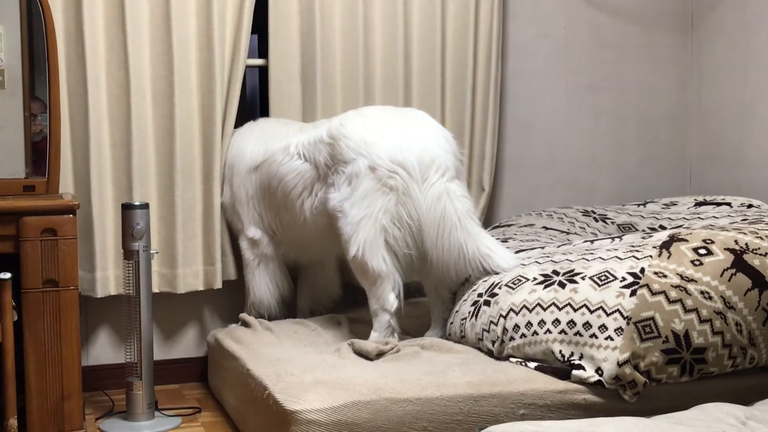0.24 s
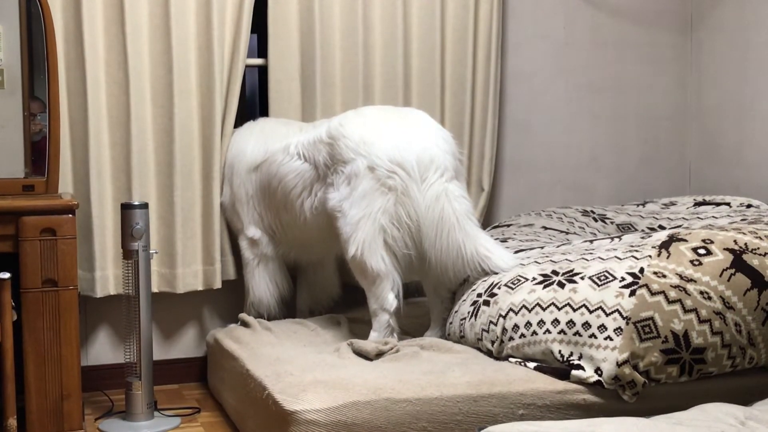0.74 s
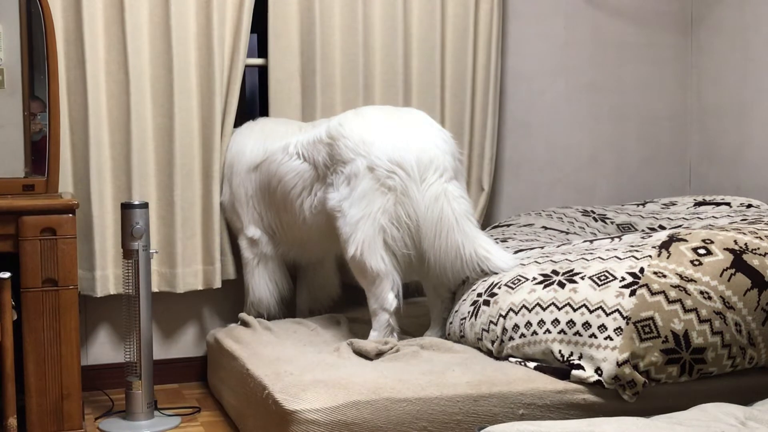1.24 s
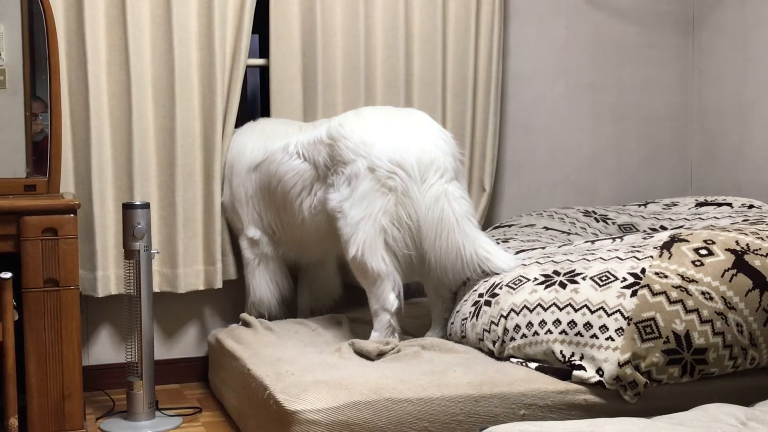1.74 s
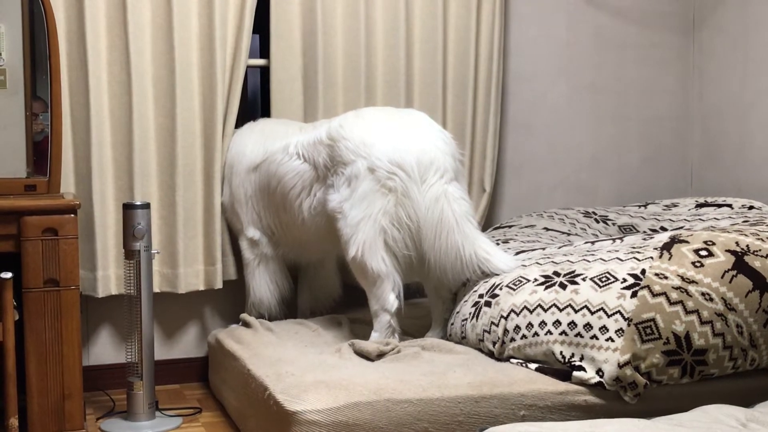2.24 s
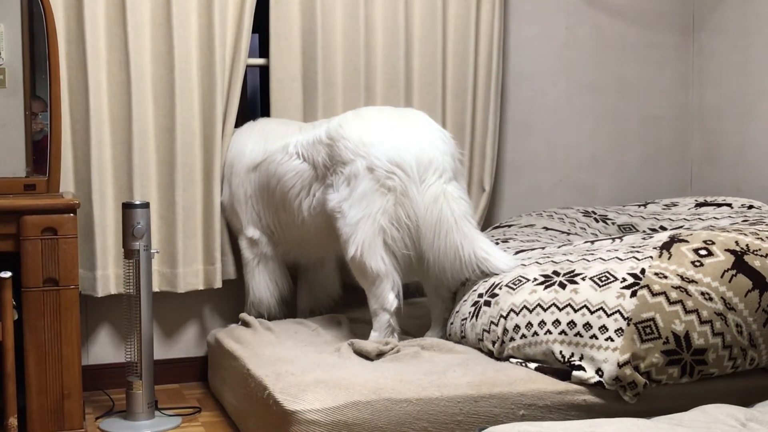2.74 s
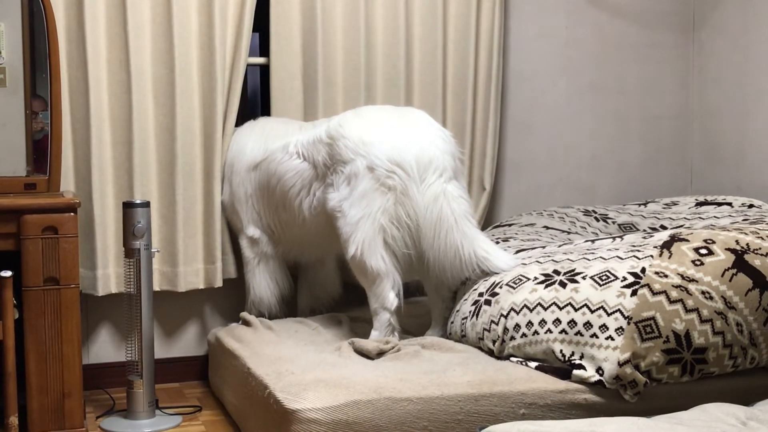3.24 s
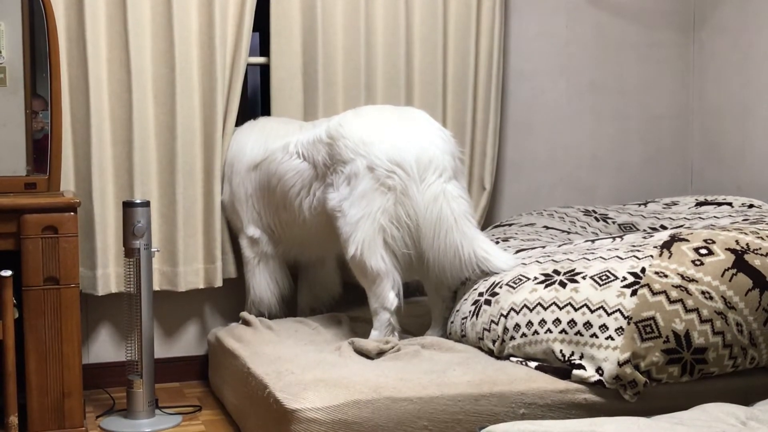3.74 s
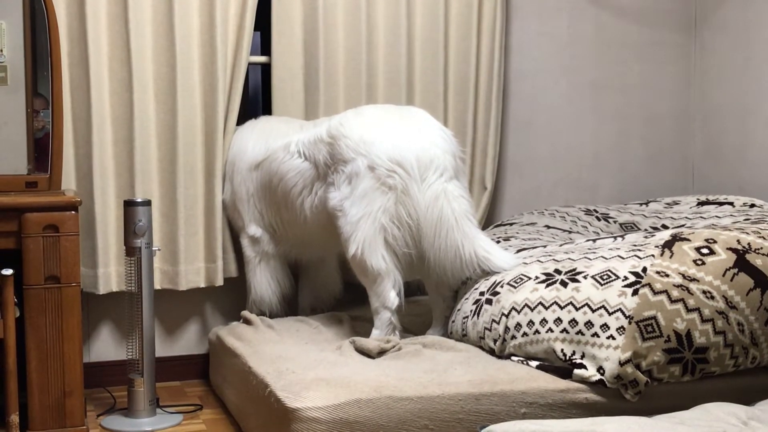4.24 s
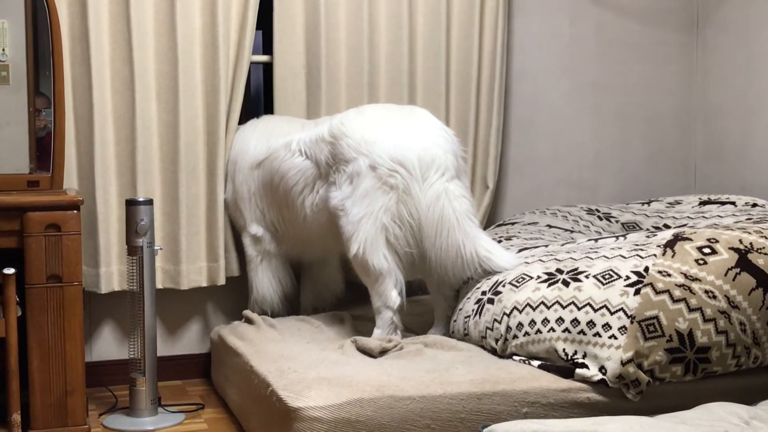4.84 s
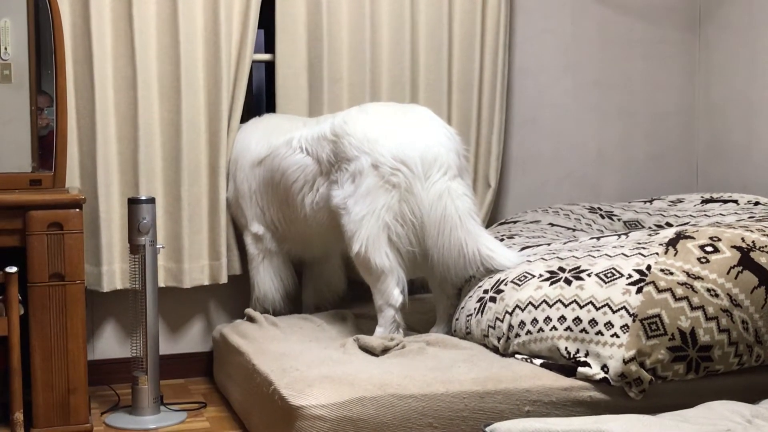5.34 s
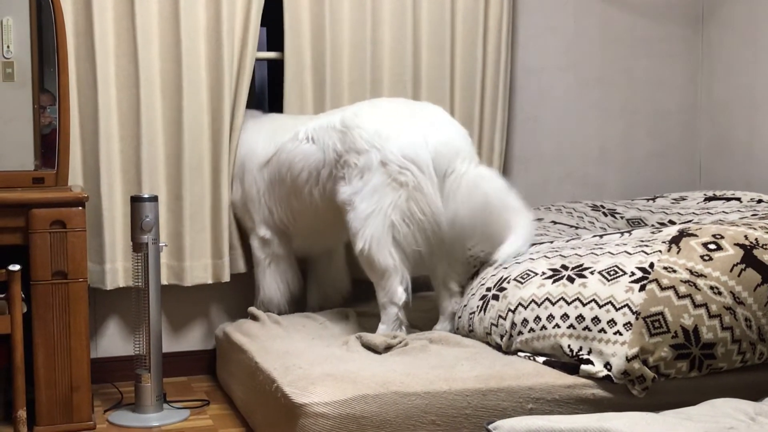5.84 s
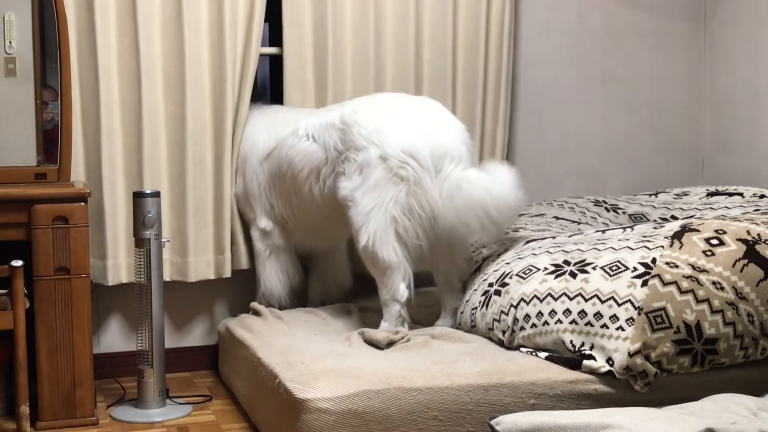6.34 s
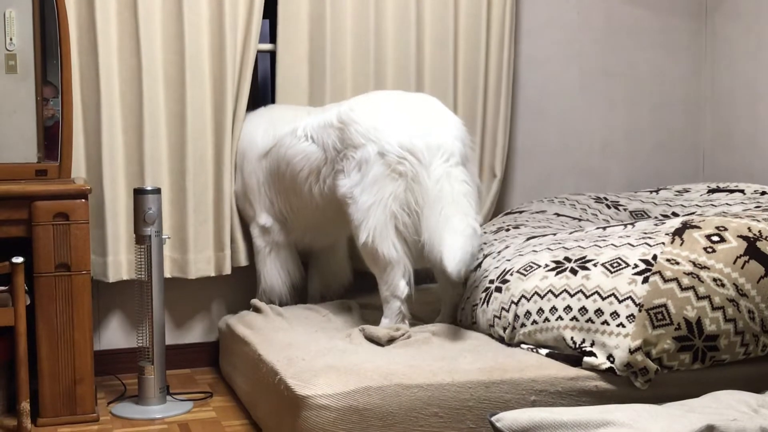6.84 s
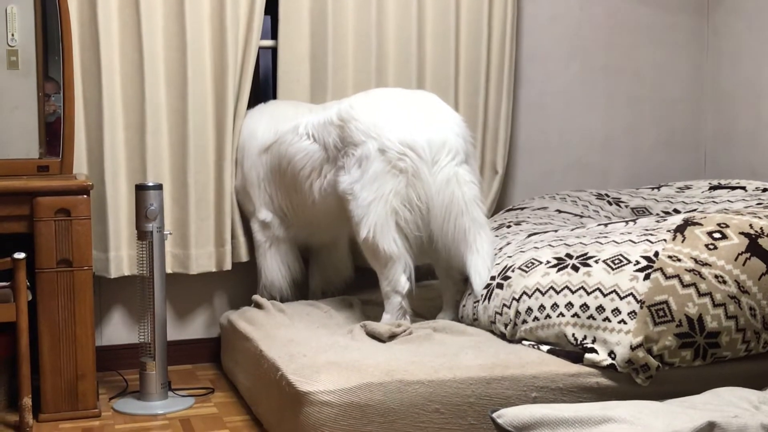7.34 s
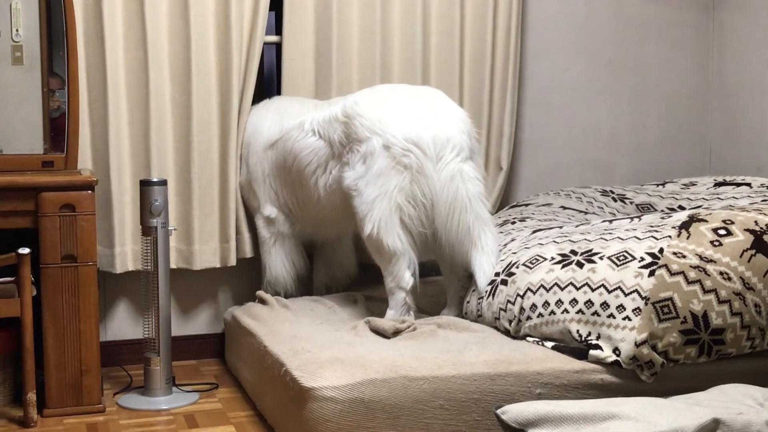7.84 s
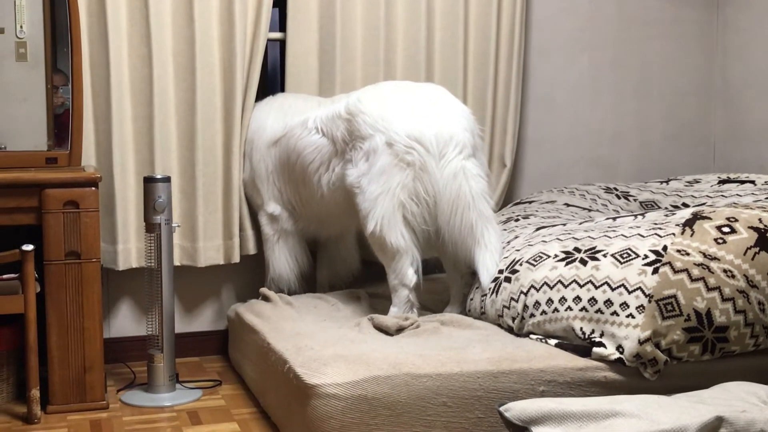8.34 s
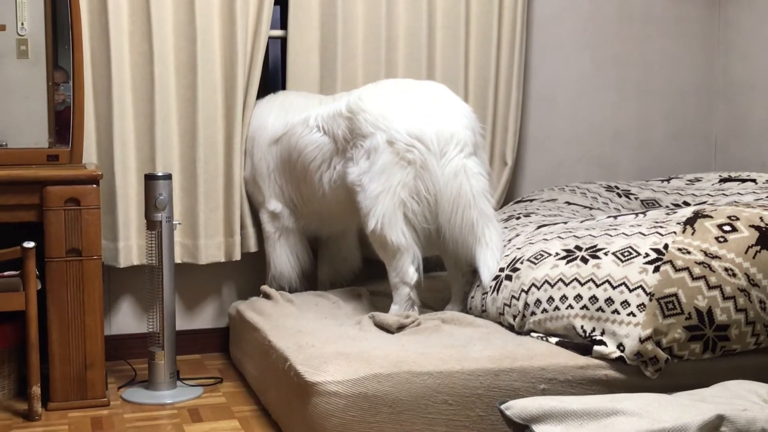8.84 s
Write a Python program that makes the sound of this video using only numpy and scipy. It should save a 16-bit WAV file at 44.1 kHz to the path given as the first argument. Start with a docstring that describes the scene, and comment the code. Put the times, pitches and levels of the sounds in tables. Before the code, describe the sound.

Quiet room air and microphone hiss surround a large dog a few steps away. Its first calls are small, closed-lip woofs, spaced apart, with a throaty low growl after the third. Midway come two deep, forceful barks close together, far louder than everything else, breaking down into a brief growl and a muffled woof. Then the jaws smack wetly several times with low soft bumps, fur brushes cloth, and a last subdued woof sounds in the short, damped room.

```python
"""A bedroom, where a large dog stands at the window: muffled woofs through nearly closed lips, low growls,
and a pair of loud open-mouthed barks that sink into a growl. Afterwards its jaws smack a few times.
The calls are fold pulses and turbulence through throat resonances; smacks and brushes are shaped noise,
and paws and jowls bump as dying sines. The small furnished room answers over rumble, air and microphone hiss."""
import sys
import numpy as np
from scipy import signal
from scipy.fft import rfft, irfft, next_fast_len
from scipy.io import wavfile
from scipy.ndimage import uniform_filter1d, minimum_filter1d, map_coordinates

SR = 44100
rng = np.random.default_rng(int(sys.argv[2]) if len(sys.argv) > 2 else 0)


def dump(signal):
    """Clip the signal to [-1, 1] and save it as 16-bit WAV at the path in sys.argv[1]."""
    limited = np.clip(np.atleast_2d(signal).T, -1, 1)
    pcm = np.round(limited * 32767).astype(np.int16)
    wavfile.write(sys.argv[1], SR, pcm)


N = 400869  # length in samples
FADE_S = 0.018  # soft ends of every call


def amp(db):
    """Decibels to a linear gain."""
    return 10 ** (np.asarray(db) / 20)


def unit(x):
    """x scaled to rms 1."""
    return x / np.sqrt(np.mean(x ** 2) + 1e-20)


def along(points, hz):
    """(Hz, value) points read on a log frequency axis."""
    f, v = np.transpose(points)
    return np.interp(np.log(hz + 1), np.log(f + 1), v)


def curves(rows, t):
    """Each column after the time, read at the times t."""
    s, *cols = np.transpose(rows)
    return [np.interp(t, s, c) for c in cols]


def add(track, s, x):
    """Mix x into the track at s seconds."""
    part = track[max(round(s * SR), 0):][:len(x)]
    part += x[:len(part)]


def wobble(rate, size):
    """A smooth random curve with rate knots a second."""
    return map_coordinates(rng.standard_normal(1024), [np.arange(size) * rate / SR], mode="wrap")


def filtered(x, response):
    """x times a response of frequency."""
    m = next_fast_len(len(x) + 8192)
    return irfft(rfft(x, m) * response(np.fft.rfftfreq(m, 1 / SR)), m)[:len(x)]


def coloured(x, spectrum):
    """x through a (Hz, dB) spectrum."""
    return filtered(x, lambda hz: amp(along(spectrum, hz)))


def below(hz, edge_hz):
    """Gain of a steep low-pass."""
    return 1 / (1 + (hz / edge_hz) ** 16)


def steady(x):
    """x held near rms 1 from moment to moment."""
    power = signal.fftconvolve(x ** 2, np.hanning(2048) / 1024, "same")
    return x / np.sqrt(np.abs(power) + 1e-14)


def span(start, end):
    """Sample times from start to end, and a window that softens both ends."""
    t = np.arange(int(start * SR), int(end * SR)) / SR
    return t, np.clip(np.minimum(t - t[0], t[-1] - t) / FADE_S, 0, 1)


def climb(age, length):
    """Rises from 0 to 1, fast at first, and levels off after length seconds."""
    return 1 - (1 - np.clip(age / length, 0, 1)) ** 2


def bell(t, centre, width):
    """A smooth hump of height 1."""
    return np.exp(-((t - centre) / width) ** 2)


def plateau(t, centre, width):
    """A flat-topped hump of height 1."""
    return np.exp(-np.square(((t - centre) / width) ** 2))


def resonances(hz, modes):
    """Response of a cavity with (Hz, width, dB) modes of alternating sign."""
    return sum((-1) ** k * amp(db) * 1j * hz * w / (c * c - hz * hz + 1j * hz * w)
               for k, (c, w, db) in enumerate(modes))


def throat_gain(hz, modes):
    """Steep-sided resonances with dark valleys between them."""
    return sum(amp(db) / (1 + ((hz - c) / w) ** 2) ** 1.5 for c, w, db in modes)


# Spectra of microphone hiss, room air and room rumble. Each row: frequency in Hz, relative density in dB.
HISS_SPECTRUM = [(1530, -17), (2600, -10), (3210, -3), (3460, -3), (4150, -1.5), (4930, -5), (5770, -1),
                 (6970, -0.5), (7680, -3), (8800, 1), (10400, -5), (11300, -2.5), (12900, -4), (15200, -7),
                 (15700, -9)]
AIR_SPECTRUM = [(47, -43), (80, -2), (150, -3.5), (173, 3.5), (206, -3.5), (239, 1.5), (272, -9.5),
                (391, -9.5), (487, -16), (776, -8.5), (847, -13), (1120, -9), (1290, -12.5), (1780, -8.5),
                (2600, -11.5), (3380, -19.5), (5720, -120)]
RUMBLE_SPECTRUM = [(15, -34), (28, -21), (43, 5), (62, -0.5), (90, -13.5), (140, -12), (300, -74)]
# Swells of the rumble. Each row: centre in seconds, rise in dB, half length in seconds.
RUMBLE_SWELLS = [(2.0, 6, 0.6), (8.9, 8, 0.5)]
HISS_DB = -47.5
AIR_DB, AIR_WANDER_DB = -50, 1.0
RUMBLE_DB, RUMBLE_WANDER_DB = -59.5, 0.5  # level outside the swells, and its slow wander


def background():
    """Room air, a slowly changing rumble and the microphone's hiss, each as coloured noise."""
    def noise(spectrum):
        return unit(coloured(rng.standard_normal(N), spectrum))

    swell_db = sum(db * bell(np.arange(N) / SR, s, width) for s, db, width in RUMBLE_SWELLS)
    air = amp(AIR_DB + AIR_WANDER_DB * wobble(5, N)) * noise(AIR_SPECTRUM)
    rumble = amp(RUMBLE_DB + swell_db + RUMBLE_WANDER_DB * wobble(2, N)) * noise(RUMBLE_SPECTRUM)
    return air + rumble + amp(HISS_DB) * noise(HISS_SPECTRUM)


# Narrow humps in the hiss. Each row: centre in Hz, width in Hz, rms level in dB.
HISS_HUMPS = [(1115, 27, -65.5), (1768, 8.3, -66), (2534, 20, -70), (2901, 37, -65.5), (7130, 120, -65)]


def humps():
    """Thin, airy bands of noise that barely stand out of the hiss."""
    def band(centre, width):
        return unit(filtered(rng.standard_normal(N), lambda hz: throat_gain(hz, [(centre, width, 0)])))

    return sum(amp(db) * band(centre, width) for centre, width, db in HISS_HUMPS)


# Fur brushing curtain and bedding. Each row: centre in seconds, level in dB, length in seconds, pitch centre in Hz.
BRUSHES = [(1.018, -51, 0.029, 1550), (1.807, -54, 0.038, 930), (2.458, -50.5, 0.054, 1280),
           (3.32, -62, 0.014, 1150), (5.197, -43.5, 0.011, 1519), (5.22, -48.5, 0.046, 2150),
           (7.499, -49.5, 0.022, 415), (7.574, -49, 0.034, 470), (7.797, -50, 0.043, 417),
           (8.277, -52.5, 0.074, 1860), (8.807, -45, 0.027, 2480), (8.972, -54.5, 0.23, 432)]


def brushes(octaves=0.46, grain_db=3):
    """Fur sliding over cloth: short, uneven swells of soft friction noise."""
    out, t = np.zeros(N), np.arange(-SR // 4, SR // 4) / SR
    for s, db, length, centre_hz in BRUSHES:
        rub = filtered(rng.standard_normal(len(t)),
                       lambda hz: 1 / (1 + (np.log2((hz + 1) / centre_hz) / octaves) ** 2))
        grainy = unit(rub * amp(grain_db * wobble(123.4, len(t))))
        add(out, s + t[0], grainy * amp(db) * np.exp(-.5 * (t / length) ** 2))
    return out


# Bumps of jowls and paws. Each row: start in seconds, level before the decay in dB, pitch in Hz, t60 in seconds.
BUMPS = [(1.786, -34, 120, 0.21), (2.395, -34, 55.5, 0.11), (5.024, -42, 129, 0.29),
         (5.145, -33.5, 50, 0.075), (5.195, -32.5, 74.4, 0.081), (7.017, -28.5, 82, 0.25),
         (7.125, -32.5, 65, 0.18), (7.379, -24.5, 98.7, 0.2), (8.853, -21, 206, 0.03)]


def bumps(attack=0.005):
    """Soft, heavy contacts: low sines with a softened start that die away."""
    out, t = np.zeros(N), np.arange(SR // 3) / SR
    for s, db, hz, t60 in BUMPS:
        ring = amp(db - 60 * t / t60) * np.sin(2 * np.pi * hz * t)
        add(out, s, ring * (1 - np.exp(-t / attack)))
    return out


# One list per growl. Each row: time in seconds, pulse rate in Hz, level in dB before that growl's gain.
GROWLS = [
    [(2.5, 58.4, -51), (2.67, 60.96, -49), (2.944, 60.74, -47.5), (3.306, 65.7, -46), (3.576, 64.5, -47.5),
     (3.864, 66, -53), (3.9, 66.4, -55)],
    [(6.14, 105.3, -40), (6.196, 92.5, -42), (6.266, 82.0, -49), (6.332, 74.6, -46), (6.454, 70.8, -45),
     (6.664, 68.5, -41.5), (6.78, 62.6, -53)],
]
# Overtones, one list per growl. Each row: multiple of the pulse rate, relative level in dB.
GROWL_OVERTONES = [
    [(1, -6), (2, 1.5), (3, -5.5), (4, -34), (5, -13.5), (6, -41)],
    [(1, 1.5), (2, 5.5), (3, -13), (4, -3.5), (5, -12.5), (6, -16.5)],
]
# Gain of each growl in dB.
GROWL_GAINS = [0, 2.5]


def growling():
    """Slack folds flap slowly behind closed lips, so only the lowest overtones get out."""
    out = np.zeros(N)
    for rows, overtones, gain_db in zip(GROWLS, GROWL_OVERTONES, GROWL_GAINS):
        t, fade = span(rows[0][0], rows[-1][0])
        pitch, db = curves(rows, t)
        phase = 2 * np.pi * np.cumsum(pitch * (1 + 0.014 * wobble(47.6, len(t)))) / SR
        tone = unit(sum(amp(level) * np.cos(k * phase) for k, level in overtones))
        add(out, t[0], tone * fade * amp(db + gain_db + 0.6 * wobble(35.7, len(t))))
    return out


# Jaw and lip smacks. Each row: start in seconds, overall level in dB, snap relative to it in dB, cavity pitch factor.
SMACKS = [(6.997, -13.5, -29, 0.88), (7.003, -12.5, -4.5, 1.01), (7.008, -16.5, -6.5, 0.74),
          (7.082, -13.5, -21, 1), (7.09, -19.5, -10.5, 0.98), (7.130, -21, -11.5, 0.92),
          (7.282, -27.5, -1.5, 1.23), (7.366, -18, -5, 1.02), (7.374, -13.5, -17, 0.78)]
# Mouth cavity before the pitch factor. Each row: resonance in Hz, width in Hz, level in dB.
MOUTH_CAVITY = [(330, 133, -2), (710, 98, -2), (857, 120, 6), (1143, 210, -1)]
# Colour of the wet snap. Each row: frequency in Hz, relative density in dB.
SNAP_SPECTRUM = [(760, -26), (1300, -2), (1920, -1), (2440, 4.5), (3460, -8), (5400, -19.5), (6250, -10),
                 (9000, -37), (11700, -58), (19800, -120)]


def smacks(ring_t60=0.051, snap_t60=0.026):
    """Each smack is a wet snap plus the short ring of the mouth cavity, both dying noise."""
    out, t = np.zeros(N), np.arange(SR // 6) / SR
    for s, db, snap_db, shape in SMACKS:
        cavity = filtered(rng.standard_normal(len(t)), lambda hz: resonances(hz / shape, MOUTH_CAVITY))
        ring = unit(cavity) * amp(-60 * t / ring_t60)
        snap = unit(coloured(rng.standard_normal(len(t)), SNAP_SPECTRUM)) * amp(-60 * t / snap_t60)
        onset = 1 - np.exp(-t / .0003)
        add(out, s, (amp(db - 7) * ring + amp(db + snap_db - 4) * snap) * onset)
    return out


def gliding(x, centre_hz, width_hz):
    """x through a resonance whose centre moves: shift it to zero, low-pass, shift back."""
    turn = np.exp(2j * np.pi * np.cumsum(centre_hz) / SR)
    lowpass = signal.butter(1, width_hz / 2, fs=SR, output="sos")
    return 2 * np.real(turn * signal.sosfiltfilt(lowpass, x / turn, padtype=None))


def folds(pitch, rough, jitter, shimmer_db):
    """Uneven fold pulses and the puffs of turbulence that swell with them; also their phase."""
    phase = 2 * np.pi * np.cumsum(pitch * (1 + jitter * rough * wobble(171.5, len(pitch)))) / SR
    pulses = np.cos(np.arange(1, 41)[:, None] * phase).sum(axis=0) * 2 * np.sqrt(pitch / SR)
    pulses *= amp(shimmer_db * rough * wobble(212.5, len(pitch)))
    puffs = unit(rng.standard_normal(len(pitch)) * (1 + np.cos(phase)))
    return pulses, puffs, phase


def voice(pitch, rough, levels_db, tract, split_hz, jitter, shimmer_db, top_rasp, chest_wall_db, flutter_db):
    """The folds ring the vocal tract, and chest, mouth and top bands each follow their own level."""
    chest_db, mouth_db, top_db = levels_db
    rough = np.clip(rough, 0, .95)
    pulses, puffs, phase = folds(pitch, rough, jitter, shimmer_db)

    def source(share):
        return tract(np.sqrt(1 - share) * pulses + np.sqrt(share) * puffs)

    def band(x, lo_hz, hi_hz):
        return steady(filtered(x, lambda hz: below(hz, hi_hz) * (1 - below(hz, lo_hz))))

    # turbulence takes a greater share of the higher bands
    chest = band(source(rough ** 1.6), 60, 505)
    mouth = band(source(rough), 405, split_hz)
    top = band(source(rough ** top_rasp), split_hz, 9000)
    # loose lips flutter and chop the upper bands
    flutter = amp(flutter_db * wobble(72.6, len(pitch)))
    # a pitch below the first resonance still radiates through the chest wall
    wall = amp(chest_wall_db) * np.sin(phase) / (1 + (pitch / 140) ** 4)
    return amp(chest_db) * (chest + wall) + flutter * (amp(mouth_db) * mouth + amp(top_db) * top)


def band_levels(age, push, levels_db, bands, haste=1):
    """Attack, drifting hold and release of each band of a call, in dB; haste speeds up the release."""
    held, after = np.minimum(age, push) - push / 2, np.maximum(age - push, 0)
    return [db - depth * (1 - climb(age, attack)) + drift * held - haste * release * after
            for db, (attack, depth, drift, release) in zip(levels_db, bands)]


# Muffled woofs. Each row: start in seconds, length of the push in seconds, chest level in dB, mouth band and
# top band relative to it in dB, pitch after the scoop in Hz, share of it that the scoop starts below,
# factor on the throat resonances.
WOOFS = [(0.622, 0.15, -35.5, 4.5, -14, 349.7, 0.3, 1.014), (1.315, 0.15, -34.5, 5, -9, 333.3, 0.14, 0.98),
         (2.628, 0.15, -33.5, 2.5, -12, 351.5, 0.094, 1.005),
         (6.574, 0.1, -25, -3.5, -18.5, 359.9, 0.179, 0.993),
         (8.515, 0.14, -34, 6.5, -13, 334.8, 0.08, 1.017)]
# Chest, mouth and top bands of a woof. Each row: attack in seconds, depth of the attack in dB,
# drift during the push in dB/s, release in dB/s.
WOOF_BANDS = [(0.093, 21.5, 1, 169), (0.091, 34, -15, 163), (0.12, 36, -9, 138)]
# Roughness of each woof at its clearest, 0-1.
WOOF_CLEAREST = [0.13, 0.45, 0.5, 0.04, 0.1]
# Throat and muzzle with lips nearly closed, before the factor. Each row: resonance in Hz, width in Hz, level in dB.
CLOSED_THROAT = [(325, 165, -6), (401.7, 32, 0.5), (635, 44, 3.5), (663, 110, -3), (994, 160, -10.5),
                 (1170, 30, 0.5), (1300, 160, -20), (1770, 74, -21), (1940, 180, -19)]
WOOF_S = 0.332  # time until a woof has died away
WOOF_SCOOP_S, WOOF_SAG_PER_S = 0.1, 0.5  # climb of the pitch, then the share of it lost each second
WOOF_CLEAR_S, WOOF_CLEAR_WIDTH_S = 0.08, 0.052  # when the folds ring clearest, and for how long either side
WOOF_ROUGH = 0.61  # roughness before and after that, 0-1


def woofs():
    """Muffled woofs through nearly closed lips: the pitch scoops up, rings clearer, then sags and roughens."""
    out = np.zeros(N)
    age, fade = span(0, WOOF_S)
    for (s, push, db, mouth_db, top_db, pitch_hz, scoop, lips), clearest in zip(WOOFS, WOOF_CLEAREST):
        below_pitch = scoop * (1 - climb(age, WOOF_SCOOP_S))
        sag = WOOF_SAG_PER_S * np.maximum(age - WOOF_SCOOP_S, 0)
        pitch = pitch_hz * (1 - below_pitch - sag)
        rough = WOOF_ROUGH + (clearest - WOOF_ROUGH) * plateau(age, WOOF_CLEAR_S, WOOF_CLEAR_WIDTH_S)
        levels_db = band_levels(age, push, (db, db + mouth_db, db + top_db), WOOF_BANDS)

        def tract(x):
            return filtered(x, lambda hz: throat_gain(hz / lips, CLOSED_THROAT))

        call = voice(pitch, rough, levels_db, tract, split_hz=1590, jitter=0.0612, shimmer_db=6.5,
                     top_rasp=0.52, chest_wall_db=-6, flutter_db=2.37)
        add(out, s, fade * call)
    return out


# Full barks. Each row: start in seconds, length of the push in seconds, chest level in dB, mouth band and
# top band relative to it in dB, target pitch in Hz, pitch climb in seconds, factor on the release speed.
BARKS = [(5.497, 0.17, -14, -2, -14.5, 424, 0.14, 1), (5.866, 0.18, -13, -2, -18.5, 413, 0.09, 1.36)]
# Chest, mouth and top bands of a bark. Each row: attack in seconds, depth of the attack in dB,
# drift during the push in dB/s, release in dB/s before the factor.
BARK_BANDS = [(0.089, 31, -30, 116), (0.11, 42, 38, 179), (0.084, 41, -5, 163)]
# Roughness in the middle of each bark before the break is added, 0-1.
BARK_MID_ROUGH = [0.25, 0.02]
# Throat and muzzle with the mouth open. Each row: resonance in Hz, width in Hz, level in dB.
OPEN_THROAT = [(299, 91, -10.5), (368, 24, -5), (396, 52, -8.5), (602, 80, -4.5), (1116, 130, -32),
               (2070, 100, -29), (2390, 190, -39), (2880, 110, -42.5), (4230, 200, -38), (4640, 220, -43.5),
               (5420, 300, -36.5)]
# Resonances added by each bark, the first gaping wide, the second rounder.
# Each row: resonance in Hz, width in Hz, level in dB.
GAPE = [
    [(703, 20, -3.5), (1450, 190, -18.5)],
    [(614, 52, -3.5), (1410, 140, -25), (2470, 110, -40)],
]
# The chest band dips as the falling pitch leaves the first resonance, and swells as its octave enters.
# Each row: pitch in Hz, half width in Hz, gain in dB.
PASSING = [(297, 73, -14), (180, 34, 9)]
BARK_S = 0.39  # time until a bark has died away
SLACK_HZ, SLACKEN_S = 88.63, 0.044  # pitch of slack folds, and the time constant of sinking to it
BARK_ROUGH = 0.2  # usual roughness, 0-1
BARK_MID_S, BARK_MID_WIDTH_S = 0.105, 0.044  # when the middle roughness holds, and for how long either side
BREAK_ROUGH, BREAK_WIDTH_S = 0.36, 0.03  # the voice breaks as the push ends: added roughness, half length
RASP_DB = 32  # rough folds are brighter: gain of the top band per unit of middle roughness
JAW_SHUT_HZ, JAW_OPEN_HZ, JAW_DROP_S = 720, 1051, 0.17  # the dropping jaw lifts the second resonance
TREBLE_HZ, TREBLE_OPEN_DB, TREBLE_SHUT_DB = 1990, 4.5, -20  # the high resonances get out as the jaw drops


def barks(jaw_db=-5, jaw_width_hz=170):
    """Two full barks with the jaw swinging open: the folds tense, hold their pitch, break and go slack."""
    out = np.zeros(N)
    age, fade = span(0, BARK_S)
    opening = climb(age, JAW_DROP_S)
    jaw_hz = JAW_SHUT_HZ + (JAW_OPEN_HZ - JAW_SHUT_HZ) * opening
    treble = amp(TREBLE_SHUT_DB + (TREBLE_OPEN_DB - TREBLE_SHUT_DB) * opening)

    def jaw(x):
        return amp(jaw_db) * gliding(filtered(x, lambda hz: below(hz, 1870)), jaw_hz, jaw_width_hz)

    def lips(x):
        return x + (treble - 1) * filtered(x, lambda hz: 1 - below(hz, TREBLE_HZ))

    for row, mid_rough, gape in zip(BARKS, BARK_MID_ROUGH, GAPE):
        s, push, db, mouth_db, top_db, pitch_hz, climb_s, haste = row
        tension = climb(age, climb_s) * np.exp(-np.maximum(age - push, 0) / SLACKEN_S)
        pitch = SLACK_HZ + (pitch_hz - SLACK_HZ) * tension
        rasp = (mid_rough - BARK_ROUGH) * plateau(age, BARK_MID_S, BARK_MID_WIDTH_S)
        rough = BARK_ROUGH + rasp + BREAK_ROUGH * bell(age, push, BREAK_WIDTH_S)
        passing_db = (age > push) * sum(gain * bell(pitch, hz, width) for hz, width, gain in PASSING)
        full_db = (db + passing_db, db + mouth_db, db + top_db + RASP_DB * rasp)
        levels_db = band_levels(age, push, full_db, BARK_BANDS, haste)

        def tract(x):
            throat = filtered(x, lambda hz: throat_gain(hz, OPEN_THROAT) + throat_gain(hz, gape))
            return lips(throat) + jaw(x)

        call = voice(pitch, rough, levels_db, tract, split_hz=1088, jitter=0.0715, shimmer_db=3,
                     top_rasp=0.49, chest_wall_db=-1.5, flutter_db=2.3)
        add(out, s, fade * call)
    return out


# Decay of the furnished room. Each row: frequency in Hz, t60 in seconds.
ROOM_DECAY = [(150, 0.54), (500, 0.15), (1500, 0.26), (6000, 0.085)]


def bedroom(x):
    """A short diffuse answer of dying noise; curtains and bedding soak up the treble first."""
    hz, t, z = signal.stft(rng.standard_normal(SR // 2), SR, nperseg=256)
    tail = signal.istft(z * amp(-60 * t / along(ROOM_DECAY, hz)[:, None]), SR, nperseg=256)[1]
    # the answer starts 256 samples late
    return signal.fftconvolve(x, np.pad(tail / np.linalg.norm(tail), (256, 0)))[:N]


def scene():
    """The dog in its room; calls and smacks also excite the room."""
    calls, jaws = woofs() + barks(), smacks()
    room = bedroom(amp(-7) * calls + amp(-10) * jaws)
    return background() + humps() + brushes() + bumps() + growling() + room + jaws + calls


def gain_control(x, threshold_db=-17, slope=0.36, hold=0.14, glide=0.11):
    """Loud sound turns the gain down; it stays down a moment, then recovers."""
    level_db = 10 * np.log10(np.abs(uniform_filter1d(x ** 2, 1024)) + 1e-12)
    cut_db = -slope * np.maximum(level_db - threshold_db, 0)
    held, eased = int(hold * SR / 2), int(glide * SR / 2)
    cut_db = minimum_filter1d(cut_db, 2 * held + 1, origin=held)
    return x * amp(uniform_filter1d(cut_db, 2 * eased + 1, origin=eased))


CEILING = 0.75  # peak amplitude


def limiter(x, size=257):
    """The gain ducks for a few milliseconds around any peak above the ceiling."""
    needed = CEILING / np.maximum(np.abs(x), CEILING)
    return x * uniform_filter1d(minimum_filter1d(needed, size), size)


TOP_HZ = 15750  # nothing is kept above this


def record(dry):
    """Gain control, peak limiter and the band limit."""
    return filtered(limiter(gain_control(dry)), lambda hz: hz < TOP_HZ)


dry = scene()
out = record(dry)
dump(out)
```